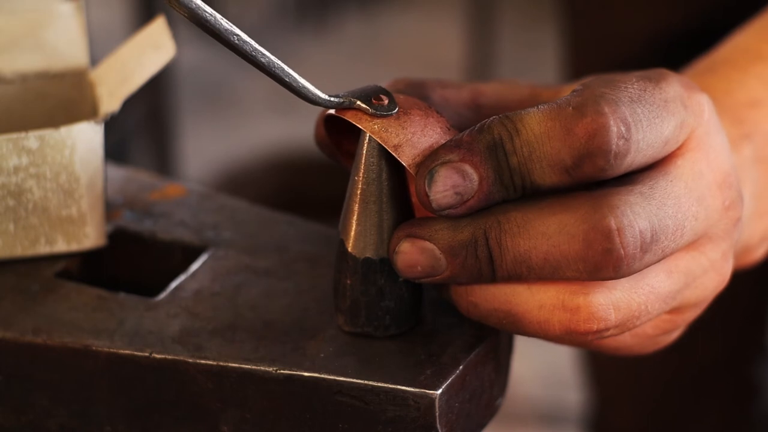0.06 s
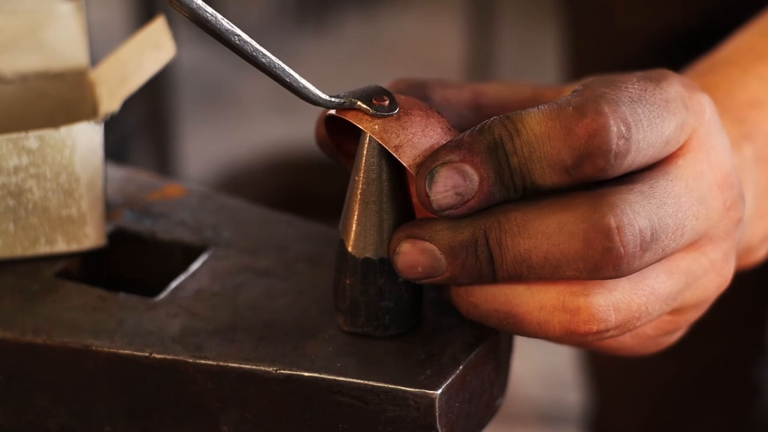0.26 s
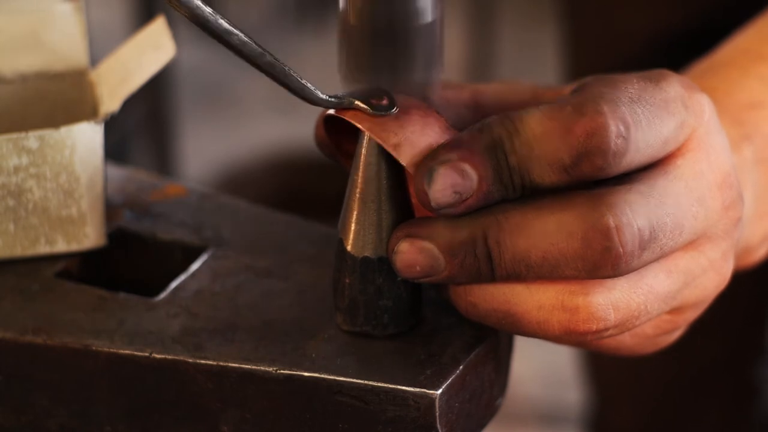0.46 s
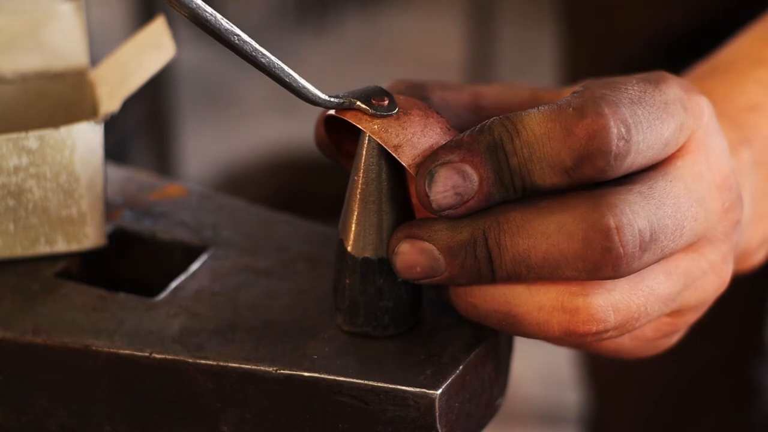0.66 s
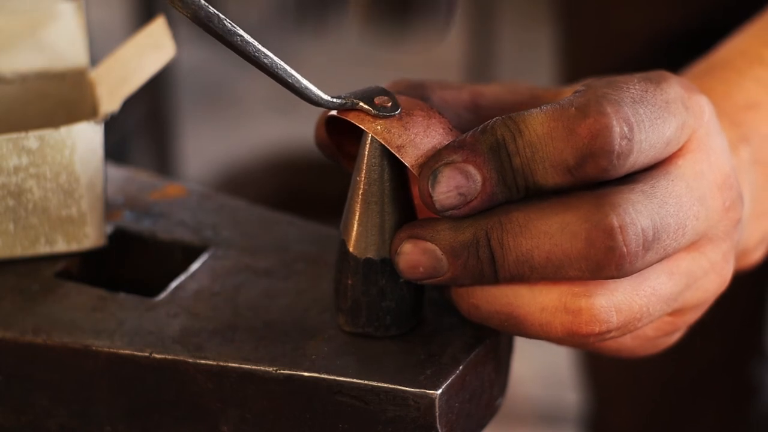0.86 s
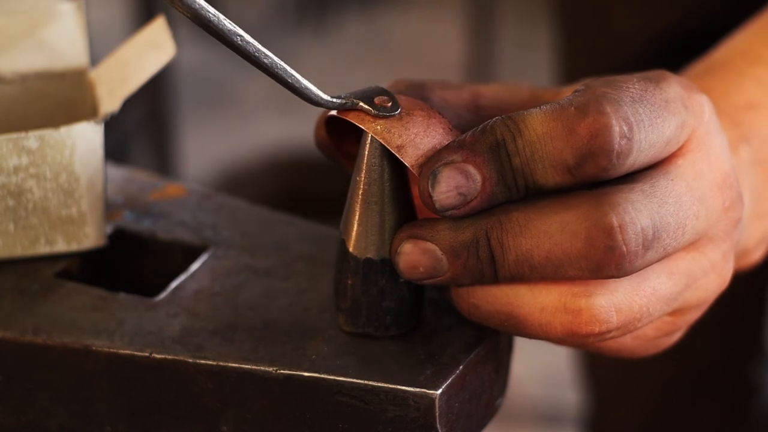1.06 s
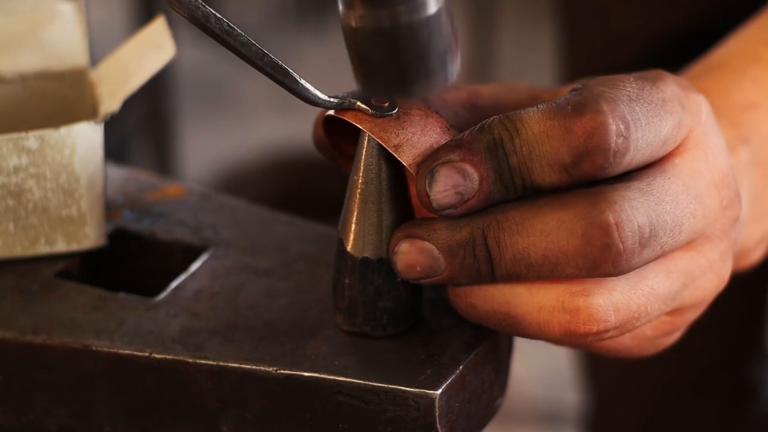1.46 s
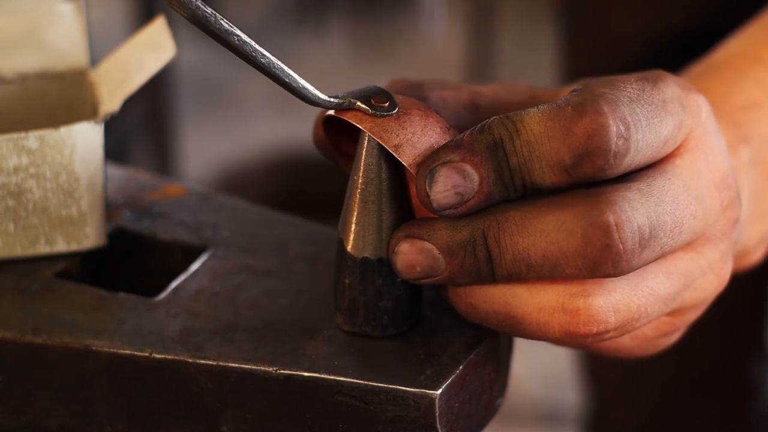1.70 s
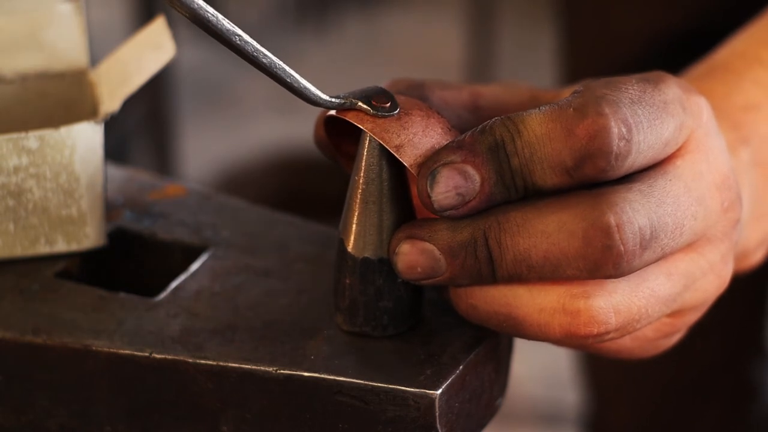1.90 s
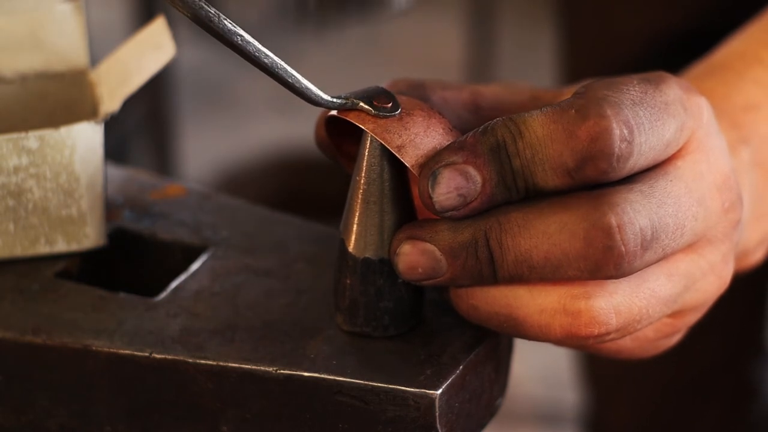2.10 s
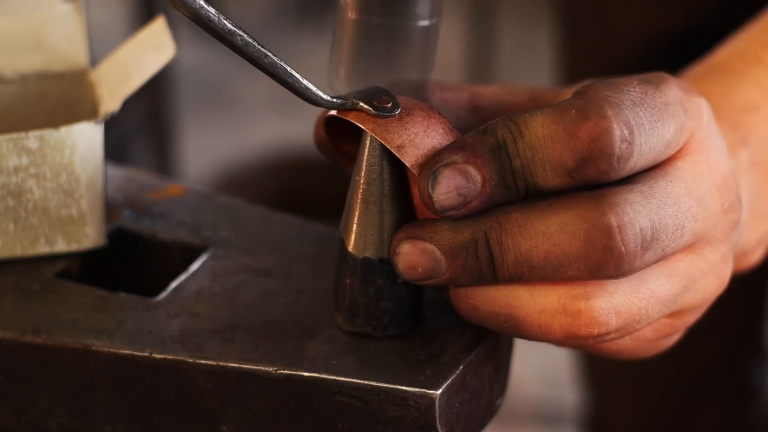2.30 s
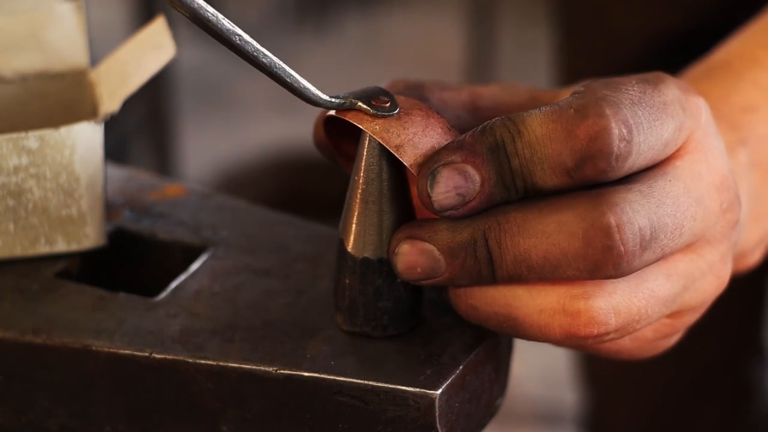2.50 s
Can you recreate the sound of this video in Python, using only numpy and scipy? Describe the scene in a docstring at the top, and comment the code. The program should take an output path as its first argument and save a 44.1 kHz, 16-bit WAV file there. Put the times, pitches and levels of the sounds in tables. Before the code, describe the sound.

Close, even hammer blows clank on a small metal piece over an anvil stake.

```python
"""A hammer strikes a small metal piece on a stake set in an anvil, about three even blows a second.
Each blow is a harsh crack, a short hand-damped clank and a thud of the anvil and its stand;
some are followed by a light touch as the hammer rebounds. The workshop rings on between the blows,
over a low steady rush. One microphone stands close to the anvil and overloads slightly."""
import sys
import numpy as np
from scipy import signal
from scipy.fft import rfft, irfft, next_fast_len
from scipy.io import wavfile

SR = 44100
rng = np.random.default_rng(int(sys.argv[2]) if len(sys.argv) > 2 else 0)


def output_pcm(signal):
    """Save a mono or channel-first signal as 16-bit PCM at the path in sys.argv[1].

    Samples are clipped to [-1, 1] before scaling.
    """
    pcm = np.clip(np.atleast_2d(signal).T, -1, 1) * 32767
    wavfile.write(sys.argv[1], SR, np.round(pcm).astype(np.int16))


N = 116865
LEAD = SR // 4  # samples of run-up, so the scene can open on a blow already ringing
T = np.arange(SR) / SR  # the one second in which a blow dies away

# Spectrum of the hammer's contact, heard close up. Each row: frequency in Hz, noise density in dB.
CONTACT_SPECTRUM = [(200, -26), (600, -6), (1150, -6), (1700, -6), (2400, -3), (3700, -6.5), (4500, -2.5),
                    (5200, 7), (6400, -6.5), (8000, -13), (10300, -15.5), (11700, -14.5), (13000, -23),
                    (15500, -24)]


def amp(db):
    """Decibels to gain."""
    return 10 ** (np.asarray(db) / 20)


def along(points, hz):
    """Read a curve of (Hz, value) points on a log frequency axis."""
    freqs, values = np.transpose(points)
    return np.interp(np.log(hz + 1), np.log(freqs + 1), values)


def filtered(x, response):
    """Filter x by a gain given as a function of Hz."""
    size = next_fast_len(len(x) + 8192)
    return irfft(rfft(x, size) * response(np.fft.rfftfreq(size, 1 / SR)), size)[:len(x)]


def noise(spectrum, size, tilt_db=0):
    """Coloured noise of rms 1, tilted by tilt_db per octave."""
    white = rng.standard_normal(size)
    x = filtered(white, lambda hz: amp(along(spectrum, hz) + tilt_db * np.log2(hz + 1)))
    return x / x.std()


def fade(t, t60):
    """A decay of 60 dB in t60 seconds."""
    return amp(-60 * t / t60)


def rise(seconds):
    """A soft start with this time constant."""
    return 1 - np.exp(-T / seconds)


def ring(modes, scatter_db=0, loose=0):
    """Damped (Hz, dB, t60) modes; loose ones start at a random point of their swing."""
    sound = np.zeros(len(T))
    for hz, db, t60 in modes:
        envelope = amp(db + scatter_db * rng.normal()) * fade(T, t60)
        sound += envelope * np.sin(2 * np.pi * (hz * T + loose * rng.random()))
    return sound


def add(track, start_s, sound):
    """Mix a sound in at start_s, counted from the end of the run-up."""
    part = track[LEAD + round(start_s * SR):][:len(sound)]
    part += sound[:len(part)]


def crack(bright_db, press_s):
    """A dense burst swells until the piece is pressed home, snaps and dies; things nearby scatter it."""
    after = np.maximum(T - press_s, 0)
    swell = np.minimum(T / press_s, 1)
    snap = amp(6) * swell ** 2 * fade(after, t60=0.0078)
    burst = noise(CONTACT_SPECTRUM, len(T), bright_db) * (fade(after, t60=0.045) + snap)
    scatter = amp(-17) * noise(CONTACT_SPECTRUM, len(T), tilt_db=-3.5) * fade(after, t60=0.15)
    return amp(-14.5) * swell * (burst + scatter)


def clank(clank_db, thin_db, head_db):
    """Stake and hand-damped piece ring briefly; a thin steel tone and the hammer head ring on."""
    # Modes of the stake and the piece. Each row: frequency in Hz, level in dB, t60 in seconds.
    stake_modes = [(2263, -24, 0.022), (2539.5, -8, 0.059), (2562, -42, 0.76), (4570, -28, 0.086),
                   (4777, -20.5, 0.05686), (5237, -12.5, 0.027), (5400, -21, 0.02), (5710, -30, 0.043),
                   (6630, -41, 0.11), (6820, -30.5, 0.047), (7860, -23, 0.036), (9280, -37, 0.07),
                   (11700, -34, 0.037), (14215, -64, .2)]
    thin_mode, head_mode = (6005, -22.5, 0.21), (2402, -27, 0.14)  # same columns
    stake = amp(clank_db) * ring(stake_modes, scatter_db=0.5, loose=1)
    thin = amp(thin_db) * ring([thin_mode])
    head = amp(head_db) * ring([head_mode])
    return (stake + thin + head) * rise(seconds=0.00036)


def thud():
    """The anvil is pushed down, then its stand gives way a moment later and rocks."""
    # Modes of the anvil's body. Each row: frequency in Hz, level in dB, t60 in seconds.
    anvil_modes = [(240.2, -49.5, 0.75), (354.6, -29.5, 0.053), (486.4, -27.5, 0.049), (626, -28.5, 0.013),
                   (702, -28, 0.055), (893, -33.5, 0.12), (1084, -20, 0.027), (1256, -24, 0.029),
                   (1440, -47, 0.019), (1910, -36, 0.015)]
    # Modes of the stand under it. Each row: frequency in Hz, level in dB, t60 in seconds.
    stand_modes = [(77.8, -34, 0.17), (152.8, -16, 0.043), (173.3, -31, 0.21), (215.6, -46, 0.37),
                   (289.2, -32.5, .3)]
    lag_s = 0.007126
    rocking = ring(stand_modes) * rise(seconds=0.001)
    stand = np.interp(T - lag_s, T, rocking, left=0)
    return -(ring(anvil_modes) + stand)


def touch(bright_db):
    """The rebounding hammer meets the piece again with a light tick."""
    return noise(CONTACT_SPECTRUM, len(T), bright_db) * fade(T, t60=0.02)


def hammer():
    """Blows and rebounds at the anvil: returns the direct sound and what goes into the room."""
    # Hammer blows. Each row: start in seconds, clank in dB, crack in dB, crack brightness in dB per
    # octave, thin ring in dB, hammer head ring in dB, thud in dB, seconds until the piece is pressed
    # hard on the stake, share of clank and crack sent into the room in dB.
    blows = [(-.085, -0.5, 0.5, -0.5, -3, -3, 2.5, 0.0012, -1),
             (0.2393, 2, 3.5, -0.5, 1, 3.5, -1, 0.00093, 0), (0.559, 2, -1, -.5, -7, -2, -1.5, .0016, -1.5),
             (0.8891, -3, -4.5, -1.3, -9, 2, -1, 0.0021, -0.5),
             (1.212, -1, -1.5, -0.6, -11, 2.5, -2.5, 0.0017, -1),
             (1.5159, -5, -3, 1, -14, 5, -0.5, 0.0021, -0.5),
             (1.8205, -5, -3, -1, -29.5, -0.5, 0, 0.0027, 0),
             (2.1116, 2, -2, -0.4, -18.5, -1.5, 0, 0.0018, -1.5),
             (2.4079, -3, -0.5, 0.5, -6.5, -3, 0, 0.00087, -1)]
    # Rebounds. Each row: start in seconds, level in dB, brightness in dB per octave.
    touches = [(.5762, -25, -2), (.9214, -32.5, -1), (1.2405, -32, -1), (2.1328, -25.5, -0.5)]
    direct, sent = np.zeros((2, LEAD + N))
    for start_s, clank_db, crack_db, bright_db, thin_db, head_db, thud_db, press_s, room_db in blows:
        clash = clank(clank_db, thin_db, head_db) + amp(crack_db) * crack(bright_db, press_s)
        knock = amp(thud_db) * thud()
        add(direct, start_s, clash + knock)
        add(sent, start_s, amp(room_db) * clash + knock)
    for start_s, db, bright_db in touches:
        add(direct, start_s, amp(db) * touch(bright_db))
    return direct, sent


def workshop(sound):
    """The diffuse answer of the room, each frequency dying at its own speed."""
    # How long the workshop rings. Each row: frequency in Hz, t60 in seconds.
    room_t60 = [(100, 0.4), (300, 0.58), (1000, 0.7), (2500, 1.4), (5000, 1.02), (9000, 0.71),
                (15000, 0.27)]
    # Colour of the reverberation at the microphone. Each row: frequency in Hz, level in dB.
    room_colour = [(60, -15.5), (150, -7), (280, -2), (500, -10), (1000, -5.5), (1300, -16.5),
                   (1900, -12.5), (2500, -16), (3700, -21), (4700, -16.5), (5300, -21.5), (8000, -22),
                   (9300, -18.5), (10800, -29.5), (12200, -20), (15000, -16)]
    hz, t, bands = signal.stft(rng.standard_normal(len(T)), SR, nperseg=512)
    bands = bands * fade(t, along(room_t60, hz)[:, None])
    tail = signal.istft(bands, SR, nperseg=512)[1][:len(T)]
    # The square root evens out the energy of long and short decays.
    tail = filtered(tail, lambda f: amp(along(room_colour, f))
                    * np.sqrt(2 * np.log(1000) / (SR * along(room_t60, f))))
    return signal.fftconvolve(sound, tail * rise(seconds=0.023))[:len(sound)]


def rush():
    """Room tone: a low steady rush under the hammering."""
    # Spectrum of the room tone. Each row: frequency in Hz, noise density in dB.
    rush_spectrum = [(25, 9), (50, 3), (100, 0), (180, 9.5), (400, -2.5), (1000, 0), (1600, -15.5),
                     (3500, -22.5), (5000, -25), (8000, -43), (15000, -52)]
    return amp(-47.5) * noise(rush_spectrum, N)


def scene():
    """The close hammering and its reverberation over the workshop's steady rush, in mono."""
    direct, sent = hammer()
    hammering = (direct + workshop(sent))[LEAD:]
    return (hammering + rush())[None]


def record(dry):
    """The close microphone rounds off the highest peaks; the recorder cuts deep bass and top treble."""
    ceiling, low_cut_hz, top_hz = 0.66, 60, 15850
    x = dry[0] / (1 + (dry[0] / ceiling) ** 4) ** (1 / 4)
    x = signal.sosfilt(signal.butter(4, low_cut_hz, "highpass", fs=SR, output="sos"), x)
    return filtered(x, lambda hz: 1 / np.sqrt(1 + (hz / top_hz) ** 160))[None]


dry = scene()
out = record(dry)
output_pcm(out)
```